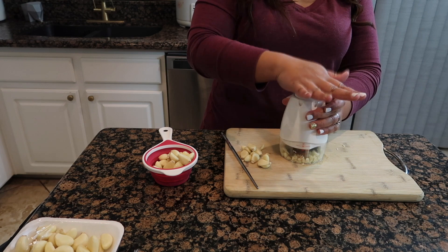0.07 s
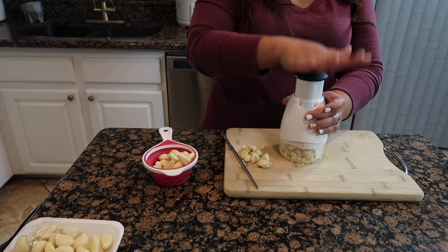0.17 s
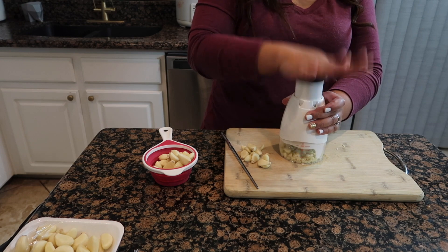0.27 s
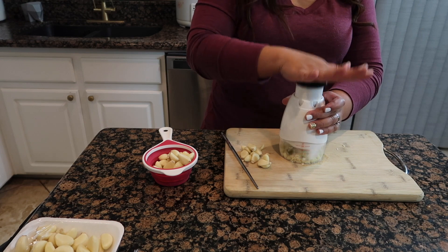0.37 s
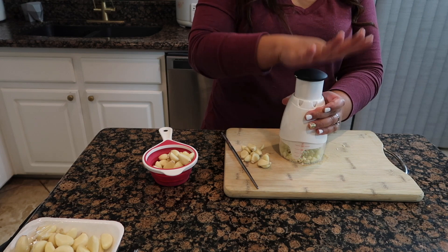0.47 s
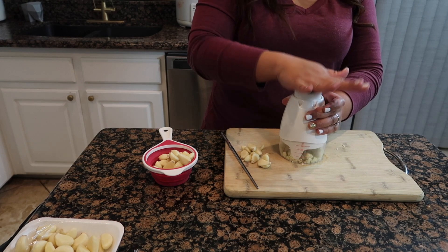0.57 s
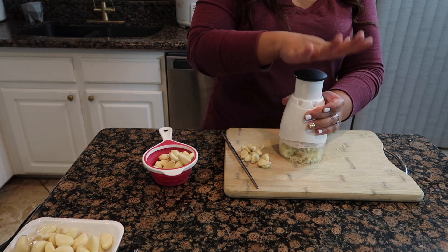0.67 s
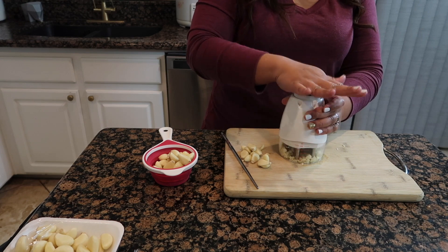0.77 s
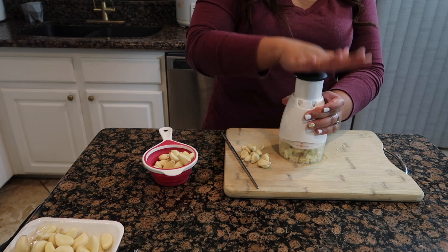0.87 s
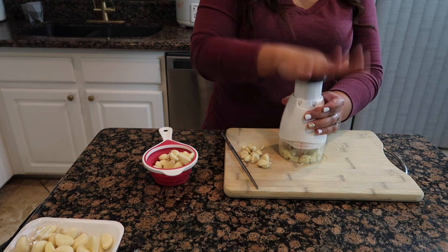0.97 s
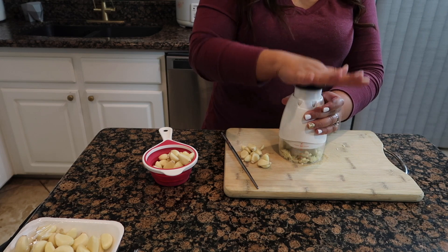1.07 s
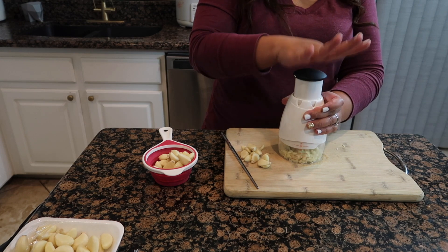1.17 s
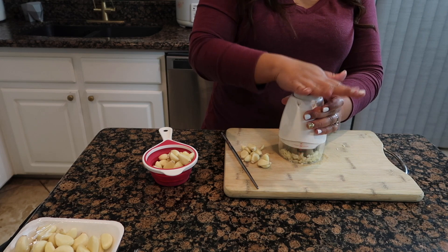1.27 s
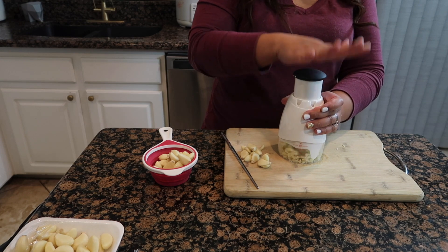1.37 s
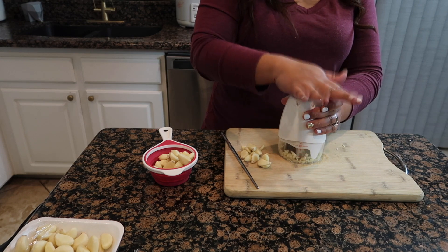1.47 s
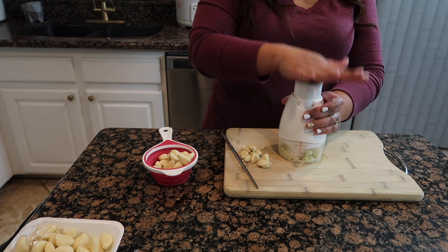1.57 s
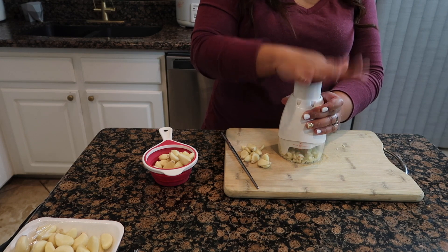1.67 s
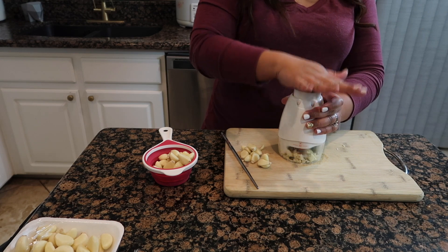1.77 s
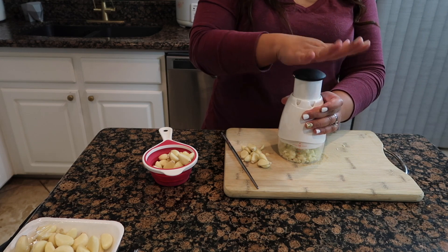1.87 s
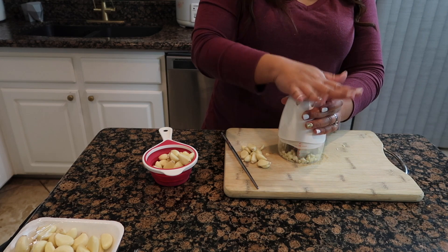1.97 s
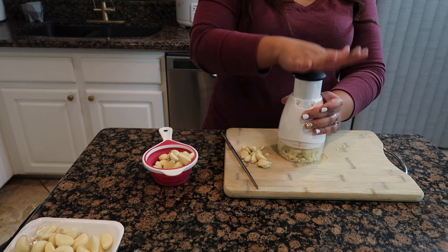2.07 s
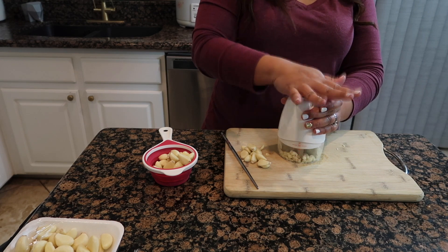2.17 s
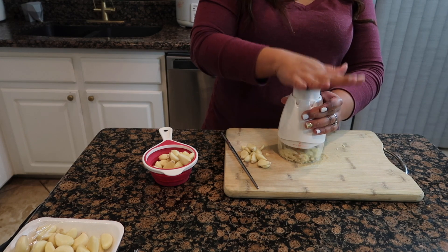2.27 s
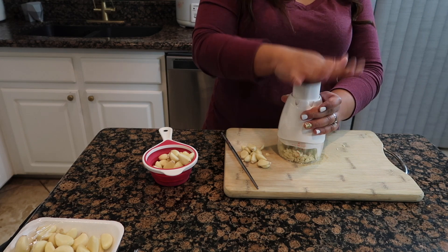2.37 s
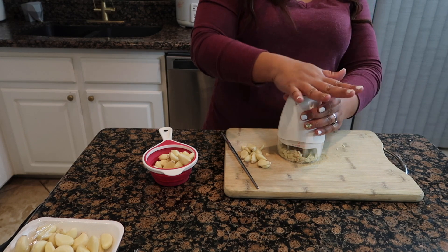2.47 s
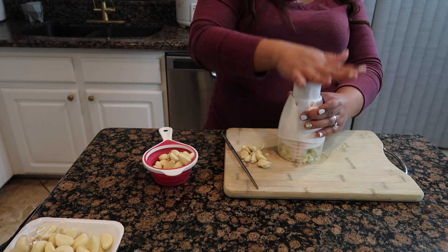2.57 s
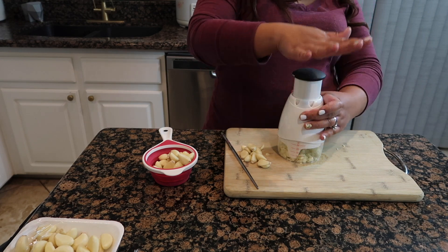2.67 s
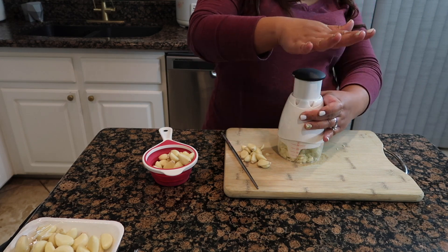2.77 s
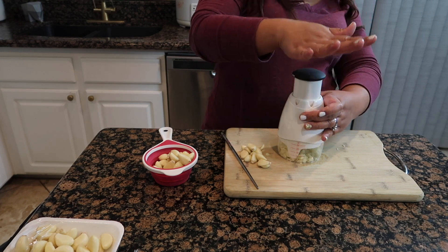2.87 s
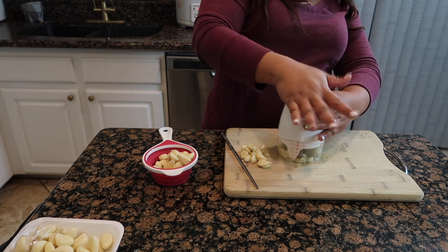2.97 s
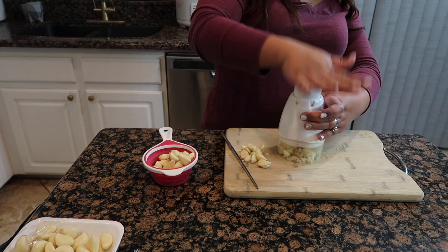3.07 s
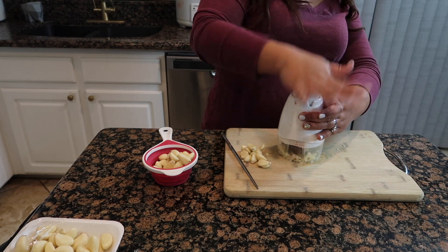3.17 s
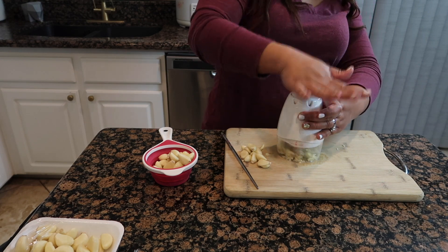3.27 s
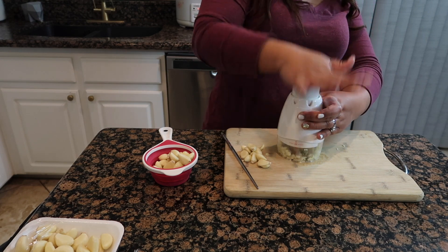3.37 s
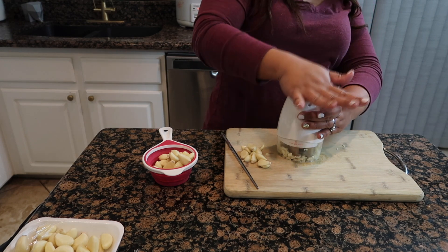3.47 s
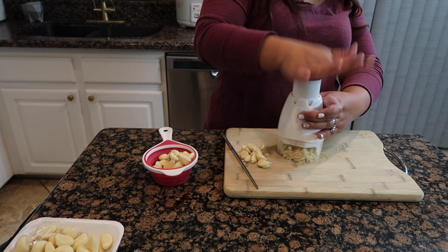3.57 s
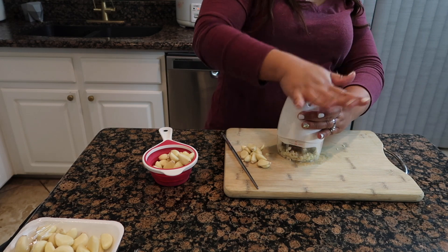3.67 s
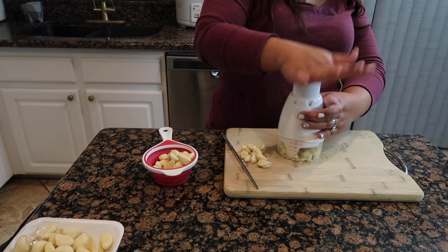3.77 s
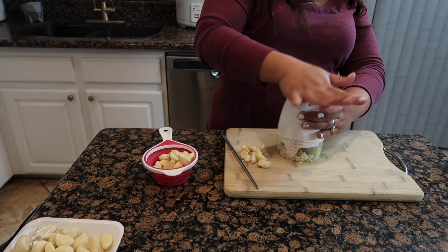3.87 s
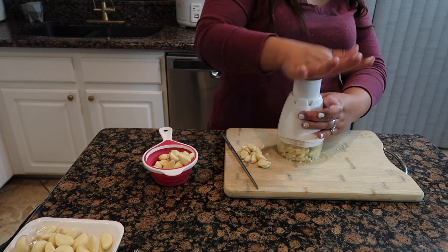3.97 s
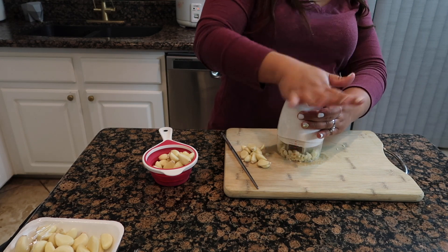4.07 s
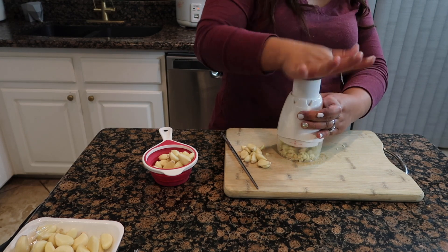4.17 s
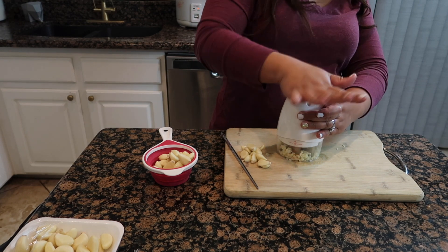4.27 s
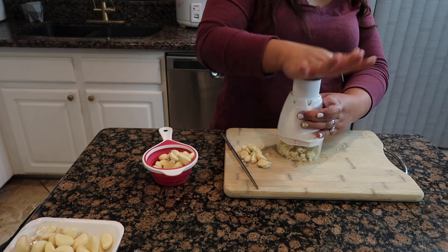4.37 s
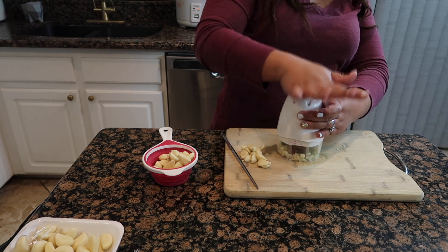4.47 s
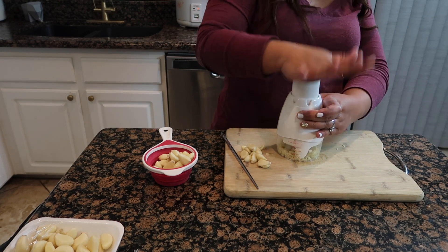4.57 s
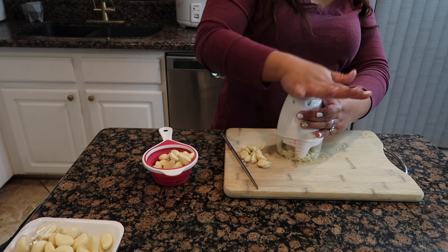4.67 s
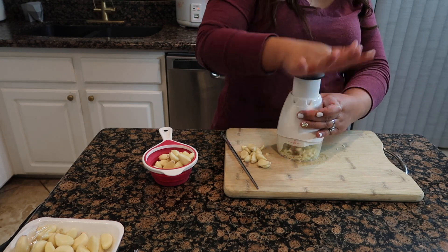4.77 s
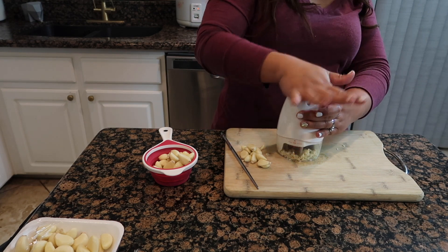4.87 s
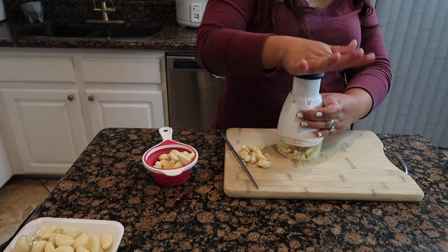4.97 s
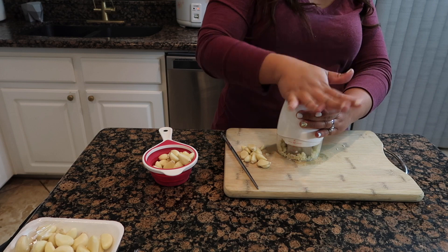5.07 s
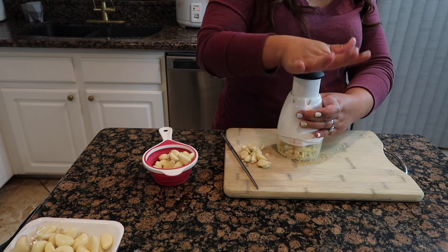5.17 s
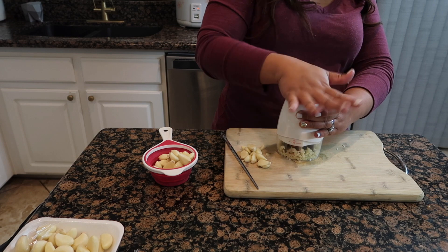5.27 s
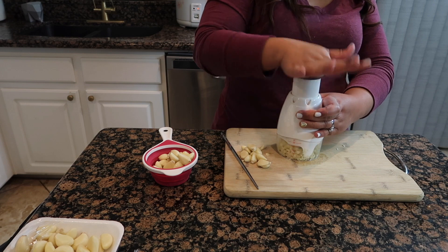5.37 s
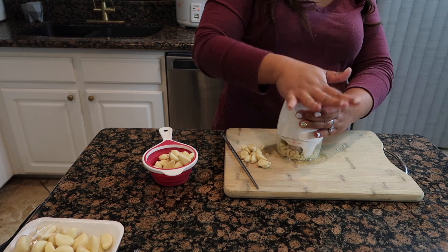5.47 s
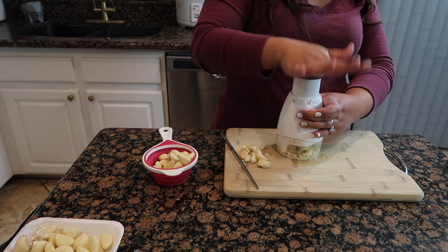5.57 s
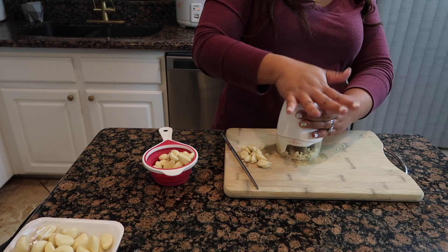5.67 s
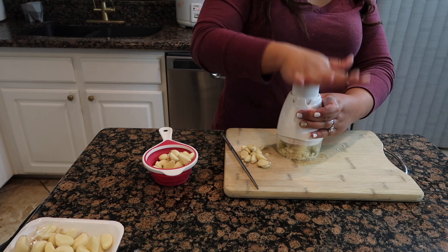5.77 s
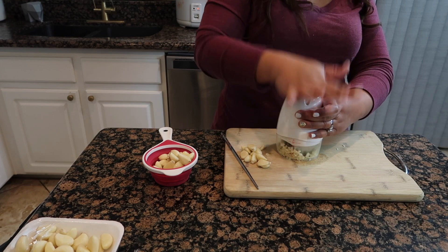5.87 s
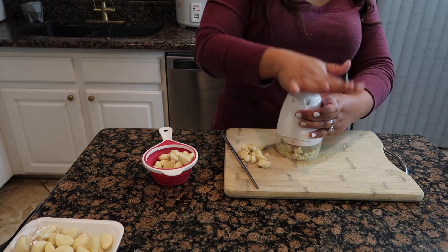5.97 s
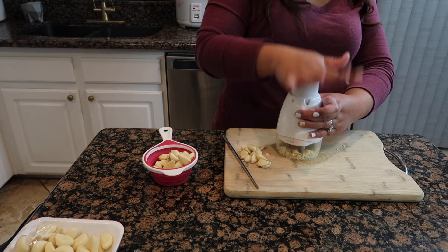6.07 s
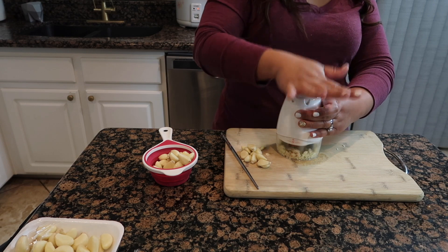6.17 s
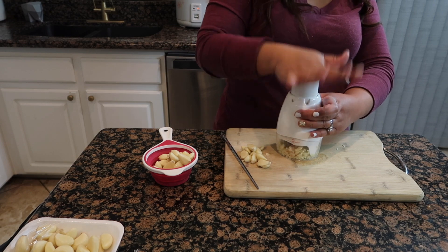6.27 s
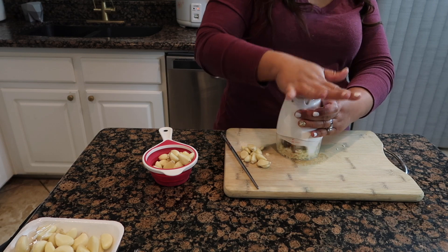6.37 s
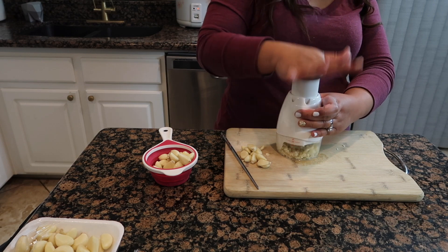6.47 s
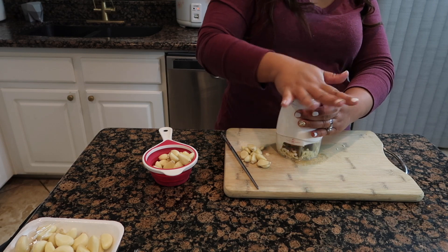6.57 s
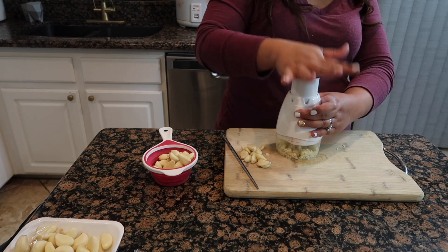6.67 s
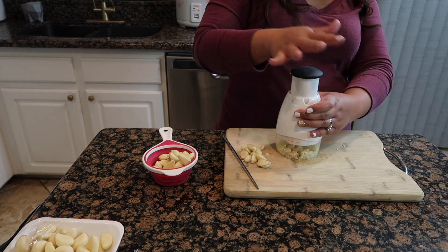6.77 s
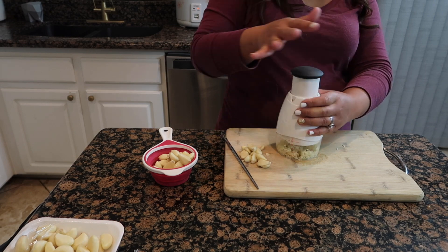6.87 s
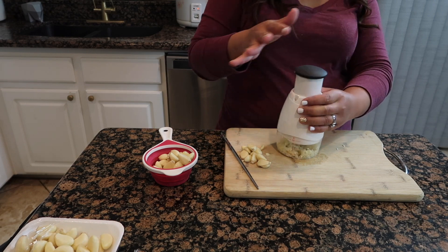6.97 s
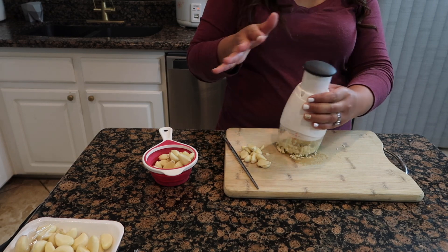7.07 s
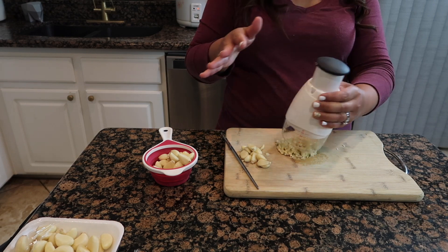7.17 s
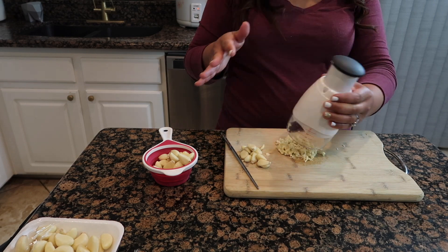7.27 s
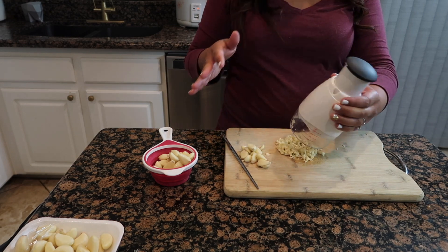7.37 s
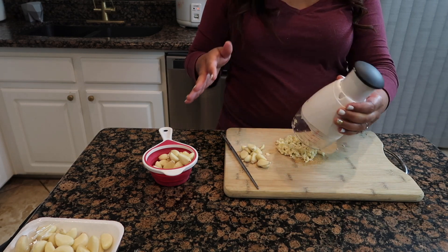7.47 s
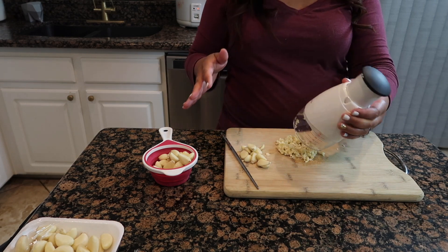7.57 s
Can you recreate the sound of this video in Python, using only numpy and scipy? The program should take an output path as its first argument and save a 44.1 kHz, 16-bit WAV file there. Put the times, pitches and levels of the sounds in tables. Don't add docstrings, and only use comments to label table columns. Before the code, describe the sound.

From the very start, a palm pumps a spring-loaded plastic chopper on a wooden board, close to the microphones. Blade blows land roughly every 0.24 seconds, loud, hard and slightly overloaded, each a short rattle with hollow plastic, woody knock, low counter thump and bright blade edge. Softer palm slaps precede the blows and spring returns clack between them, with gritty shaft scraping, crushed cloves and a faint spring sizzle. Around 2.7 seconds the rhythm breaks briefly; a cluster of loose knocks comes at 3.0. From 3.2 the strokes resume a little faster, about every 0.21 seconds, with heavier board thuds and stronger clattering returns; one near 4.45 is weaker. The last blow falls at 6.8. A short hard kitchen tail fades into faint low hum and hiss, swelling slightly until 7.6, with barely audible ticks near 7.2 to 7.3.

```python
import sys
import numpy as np
from scipy import signal
from scipy.fft import rfft, irfft
from scipy.io import wavfile
from scipy.ndimage import uniform_filter1d

SR = 44100
rng = np.random.default_rng(int(sys.argv[2]) if len(sys.argv) > 2 else 0)


def master_out(mix):
    frames = np.transpose(np.atleast_2d(mix))
    ceiling = np.clip(frames, -1, 1)
    pcm = np.round(ceiling * 32767).astype(np.int16)
    wavfile.write(sys.argv[1], SR, pcm)


def decibels_to_gain(level_db):
    exponent = np.asarray(level_db, float) / 20
    return 10 ** exponent


N = 336042
SIZE = 8192


def read(table, hz):
    f, value = np.transpose(table)
    return np.interp(np.log(np.maximum(hz, 1)), np.log(f), value)


def causal(table, hz):
    cepstrum = irfft(read(table, hz) * np.log(10) / 20)
    cepstrum[1:len(hz) - 1] *= 2
    cepstrum[len(hz):] = 0
    return np.exp(rfft(cepstrum))


def shaped(x, table):
    response = irfft(causal(table, np.fft.rfftfreq(SIZE, 1 / SR)))
    return signal.fftconvolve(x, response)[:N]


def unit(x):
    return x / np.sqrt(np.mean(x ** 2))


def grit(shape, spread_db):
    sizes = np.minimum(rng.exponential(size=shape), 5)
    return rng.standard_normal(shape) * decibels_to_gain(spread_db * sizes)


# f/Hz, level/dB
AIR_COLOUR = [(25, -39), (50, -17), (75, -0.5), (130, -5.5), (230, -4), (450, -13), (1000, -22),
              (3000, -31), (8000, -41), (13000, -50.5), (14000, -85)]
# f/Hz, level/dB
AIR_SIDE = [(60, -26.5), (110, -25.5), (200, -26), (380, -6.5), (700, -5.5), (1290, -2.5), (2380, 3),
            (4400, 3), (8120, -1), (15000, 7)]
# t/s, level/dB
AIR_LEVEL = [
    (0, -64),
    (2.899, -57),
    (2.999, -59.5),
    (6.9, -61),
    (7.2, -57.5),
    (7.62, -53.5),
]
# f/Hz, level over the air/dB
WHINE = [(13020, -31.5), (12030, -40.5)]


def air():
    t = np.arange(N) / SR
    s, db = np.transpose(AIR_LEVEL)
    mid = unit(shaped(rng.standard_normal(N), AIR_COLOUR))
    side = unit(shaped(rng.standard_normal(N), AIR_COLOUR))
    whine = sum(decibels_to_gain(level) * np.sin(2 * np.pi * hz * t) for hz, level in WHINE)
    side = shaped(side, AIR_SIDE)
    return decibels_to_gain(np.interp(t, s, db)) * np.array([mid + side + 2 * whine, mid - side])


# f/Hz, time to fall by 60 dB/s, level/dB
ROOM = [(60, .3, 2), (150, 0.11, 2.5), (300, 0.45, -9.5), (1000, 0.35, -0.5), (3200, 0.5, -9),
        (8000, 0.32, 3), (15000, .2, 3)]


def kitchen(x):
    gap_s = 0.007
    t = np.arange(SR // 2) / SR
    room = np.array(ROOM)
    tail = 0
    for hz in 60 * 2. ** np.arange(8):
        octave = signal.butter(2, [hz / 2 ** .5, hz * 2 ** .5], "bandpass", fs=SR, output="sos")
        t60 = read(room[:, :2], hz)
        gain = decibels_to_gain(read(room[:, ::2], hz))
        noise = signal.sosfilt(octave, rng.standard_normal(len(t)))
        tail = tail + gain * noise * np.exp(-np.log(1000) * t / t60) / np.sqrt(t60)
    tail = tail * (1 - np.exp(-(t / gap_s) ** 2))
    return signal.fftconvolve(x, tail / np.sqrt(np.sum(tail ** 2)))[:N]


# f/Hz, level/dB
COLOUR = [(24, -51), (44, -41), (66, -10), (140, -4.5), (205, -19), (408, -3), (462, -6), (511, -1.5),
          (1320, -4.5), (2020, 0.5), (3580, -4), (9020, -41.5), (12800, -42.5), (15600, -49.5)]
# f/Hz, level/dB, time to fall by 60 dB/s
BODY = [(76, 8.5, 0.15), (141, 8.5, 0.039), (146.3, -1.5, 0.15), (307, 0, 0.18), (414.6, 6.5, 0.11),
        (516, -4.5, 0.13), (613.4, -0.5, 0.054), (808, 2, 0.039), (907, 5, 0.059), (1090, -7.5, 0.013),
        (1222, -3.5, 0.086), (1472, 2.5, .03), (1478, -4, 0.061), (1600, -5, 0.053), (1843, -6.5, 0.033),
        (2025, -3, 0.017), (2195, -13.5, 0.028), (2437, -1, 0.0083), (2904, 0.5, 0.0067),
        (3490, -1.5, 0.01), (4087, -4, 0.06)]


def ringing(hz, gains, detune):
    f, db, t60 = np.transpose(BODY)
    f = f * detune
    damp = np.log(1000) / (np.pi * t60)
    pitch = hz[:, None]
    modes = 1j * damp * pitch / (f ** 2 - pitch ** 2 + 1j * damp * pitch)
    return causal(COLOUR, hz) * (0.69 + modes @ (decibels_to_gain(db) * gains))


def registers(hz):
    edges_hz = (200, 650, 3200)
    low = [1 / (1 + 1j * hz / edge) ** 2 for edge in edges_hz]
    high = [(1j * hz / edge / (1 + 1j * hz / edge)) ** 2 for edge in edges_hz]
    return np.array([low[0], high[0] * low[1], high[1] * low[2], high[2]])


def slides(starts, level_db, hold_s, release_s):
    attack_s = .004
    t, out = np.arange(SIZE) / SR, np.zeros(N + SIZE)
    shape = (1 - np.exp(-t / attack_s)) * np.exp(-np.maximum(t - hold_s, 0) / release_s)
    for s, gain in zip(starts, decibels_to_gain(level_db + np.zeros(len(starts)))):
        start = int(s * SR)
        out[start:start + SIZE] += gain * shape
    return out[:N]


# t/s, peak level/dB, weight on the board/dB, brightness/dB
RETURNS = [(.134,-19.5,-6,0),(.372,-15.5,1,0),(.597,-15,-5,0),(.833,-14.5,-1,0),(1.071,-17.5,0,0),(1.303,-16.5,-4,0),
           (1.543,-19.5,-2,0),(1.773,-17,1,0),(2.01,-17.5,-2,0),(2.233,-16,5,0),(3.261,-18.5,1,0),(3.498,-13.5,4,0),
           (3.715,-11.5,-4,0),(3.922,-9,-2,0),(4.326,-19.5,9,0),(4.512,-12,-6,0),(4.695,-11,2,0),(4.932,-20,0,0),
           (5.148,-15.5,0,0),(5.339,-12.5,3,0),(5.756,-11.5,3,0),(5.984,-14.5,4,0),(6.197,-18,3,0),(6.411,-7.5,-1,0),
           (6.623,-8,-1,0),(2.5,-24,0,0),(4.132,-22,0,0),(5.52,-20,0,0)]


def spring():
    s, brightness_db = np.array(RETURNS)[:, ::3].T
    band = signal.butter(2, (7000, 14500), "bandpass", fs=SR, output="sos")
    sizzle = unit(signal.sosfilt(band, grit(N, 2.2)))
    return sizzle * slides(s, -58 + brightness_db, hold_s=.025, release_s=.02)


def crunches(blows):
    level_db, swell_s = -21, .007
    t = np.arange(N) / SR
    return sum(decibels_to_gain(level_db + db) * np.exp(-np.abs(t - s) / swell_s) * (t < s) for s, db, *_ in blows)


# t/s, effort level/dB
EFFORT = [(0, -2), (.3, -3), (1.2, -4), (2.1, -4), (2.68, -6), (3.02, -4), (3.5, 0), (4.4, 0), (4.9, -1),
          (5.6, -1), (6.3, 0), (6.8, 0)]


def scrape():
    hz, t = np.fft.rfftfreq(SIZE, 1 / SR), np.arange(N) / SR
    body = ringing(hz, 0.13 * np.ones(len(BODY)), 1) * registers(hz)
    roughness = unit(uniform_filter1d(rng.standard_normal(N), size=500))
    slips = grit(N, 2.9) * decibels_to_gain(np.clip(5.6 * roughness, -12, 6))
    counter, board, housing, blade = (unit(signal.fftconvolve(slips, irfft(part))[:N]) for part in body)

    blows = BLOWS_WHOLE + BLOWS_MINCED
    going_down = slides([e[0] for e in SLAPS], -28, hold_s=.04, release_s=.015)
    biting = slides([e[0] for e in blows], -29, hold_s=.05, release_s=.03)
    coming_up = slides([e[0] for e in RETURNS], -28, hold_s=.05, release_s=.03)
    moves = crunches(blows) + going_down + biting + coming_up
    rub = moves * decibels_to_gain(np.interp(t, *np.transpose(EFFORT)) - 3)
    return rub * (housing + 0.25 * board + 0.59 * blade + decibels_to_gain(-19) * counter)


# t/s, peak level/dB, weight on the board/dB, blade edge/dB
LOOSE = [(.614,-13.5,-8,0),(.714,-16.5,-4,-5),(1.161,-19,2,0),(1.566,-21,-9,-9),(2.094,-36,2,-9),(2.591,-31,6,-6),(2.655,-25,0,0),
         (3.024,-16,0,4),(3.035,-6.5,-2,5),(3.06,-6.5,-3,4),(3.297,-19,-3,0),(3.68,-8.5,-9,-2),(3.804,-30,5,9),(3.902,-8.5,-1,-5),
         (4.39,-17,5,-4),(4.618,-15.5,-9,1),(5.01,-25,9,3),(5.325,-18.5,5,6),(5.401,-29.5,5,3),(5.969,-14.5,5,4),(6.505,-22,5,6),
         (7.228,-46,0,-4),(7.338,-43.5,2,-3)]
# t/s, peak level/dB, weight on the board/dB
SLAPS = [(.206,-17.5,4),(.453,-13,0),(.681,-9,-2),(.915,-13.5,-2),(1.169,-16,0),(1.376,-20.5,6),(1.616,-21.5,6),
         (1.869,-19.5,0),(2.115,-5.5,0),(2.599,-20.5,0),(3.146,-11,0),(3.35,-15.5,0),(3.581,-7,-3),(3.779,-16.5,1),
         (3.985,-12,-5),(4.186,-16,3),(4.406,-12.5,-3),(4.581,-9,2),(4.789,-5.5,-2),(4.987,-16,-5),(5.201,-12.5,1),
         (5.408,-18.5,-4),(5.622,-7.5,0),(5.837,-9,0),(6.059,-12.5,3),(6.274,-8.5,-1),(6.475,-18,-4),(6.711,-10,-1),(.002,-14,0),(2.34,-25,0)]
# t/s, peak level/dB, weight on the board/dB, blade edge/dB, extra rebound of the housing/dB
BLOWS_WHOLE = [(.033,-2.5,0,1,0),(.252,0,-5,-1,0),(.497,-1,-1,0,0),(.723,1,-3,0,2),(.959,-1,-4,0,5),(1.208,-2.5,-3,-2,5),
               (1.434,.5,-3,0,5),(1.687,-1,-3,-1,5),(1.924,.5,-3,-2,3),(2.156,-1,-2,0,0),(2.408,-1,-3,-2,5),(2.677,-2,2,2,5)]
BLOWS_MINCED = [(3.174,1.5,-5,2,0),(3.409,-1.5,1,2,2),(3.629,-2,2,0,0),(3.84,-1,1,1,0),(4.039,2,0,-1,0),(4.241,-1.5,1,-1,0),
                (4.451,-9.5,7,1,0),(4.632,-5,3,0,0),(4.835,3,2,1,0),(5.05,-1.5,3,0,0),(5.248,-2.5,1,0,0),(5.467,-5.5,0,0,0),
                (5.667,-.5,1,2,0),(5.891,1,3,2,0),(6.112,-1.5,1,0,0),(6.325,0,3,0,2),(6.54,2,-2,-1,2),(6.769,-3,-1,-1,2)]


def contacts():
    # counter/dB, board/dB, blade/dB; then rattle length/s
    blow, slap = (-34, -20, -16, .0036), (-24, -17, -19, .0046)
    spring_return, knock = (-22, -17, -15, .005), (-25, -19, -17, .0045)
    thud_scatter_db, length_scatter = 1.5, .15

    rows = [(blow, *r) for r in BLOWS_WHOLE + BLOWS_MINCED]
    rows += [(slap, *r, 0, 0) for r in SLAPS]
    rows += [(spring_return, *r, 0) for r in RETURNS]
    rows += [(knock, *r, 0) for r in LOOSE]
    chance = rng.standard_normal((len(rows), 2))
    found = []
    for (kind, s, peak_db, weight, edge, rebound_db), luck in zip(rows, chance):
        counter_db, board_db, blade_db, length_s = kind
        counter_db = counter_db + .5 * weight + thud_scatter_db * luck[0]
        length_s = length_s * np.exp(length_scatter * luck[1])
        found.append((s, peak_db, counter_db, board_db + weight, blade_db + edge, length_s, rebound_db))
    return found


def bite(t, length_s):
    u = np.maximum(t, 0) / length_s
    return u ** 1.39 * (np.exp(-u * 2.51) + 0.037 * np.exp(-u * 0.53))


def knocks():
    rebound_s, usual_rebound_db = 0.00589, -5
    crest_db = (6, 10, 0, 12.5)
    hz, t, out = np.fft.rfftfreq(SIZE, 1 / SR), np.arange(SIZE) / SR, np.zeros(N + SIZE)
    parts = registers(hz)
    for s, peak_db, counter_db, board_db, blade_db, length_s, rebound_db in contacts():
        chance = rng.standard_normal((3, len(BODY)))
        late_s = rebound_s * (1 + .2 * chance[2, 0])
        rebound = decibels_to_gain(usual_rebound_db + rebound_db + 1.5 * chance[2, 1])
        force = bite(t, length_s) + rebound * bite(t - late_s, 0.77 * length_s)
        modes = ringing(hz, .5 * decibels_to_gain(2.66 * chance[0]), 1 + 0.018 * chance[1])
        rings = irfft(rfft(grit(SIZE, 2.52) * force) * modes * parts)
        peaks = decibels_to_gain(peak_db + np.array([counter_db, board_db, 0, blade_db]) + crest_db)
        start = int((s - .0015) * SR)
        out[start:start + SIZE] += (peaks / np.abs(rings).max(axis=1)) @ rings
    return out[:N]


# f/Hz, level under their sum/dB
PORTS = [(60, -33.5), (110, -44), (200, -26), (380, -31), (700, -36.5), (1290, -46.5), (2380, -31),
         (4400, -7), (8120, -1), (15000, 3)]
# f/Hz, level/dB
LEAN = [(300, 0), (1000, -.5), (4000, -1.2), (8000, 0)]


def scene():
    room_db = -5.5
    dry = knocks() + scrape() + spring()
    mid = dry + decibels_to_gain(room_db) * kitchen(dry)
    smear = unit(rng.standard_normal(1024) * np.exp(-np.arange(1024) / 200.)) / 32
    scattered = signal.fftconvolve(dry, smear)[:N]
    side = shaped(1.16 * scattered + decibels_to_gain(room_db + 3) * kitchen(dry), PORTS)
    left = shaped(mid, [(f, db / 2) for f, db in LEAN])
    right = shaped(mid, [(f, -db / 2) for f, db in LEAN])
    return np.array([left + side, right - side]) + air()


def band_limit(x):
    return signal.sosfilt(signal.butter(12, 15780, fs=SR, output="sos"), x)


def record(dry):
    mix = np.tanh(0.95 * dry) / 0.79
    return band_limit(mix)


dry = scene()
out = record(dry)
master_out(out)
```